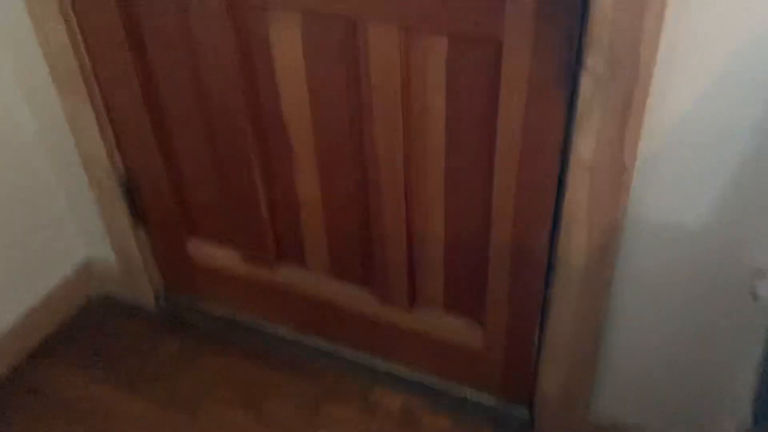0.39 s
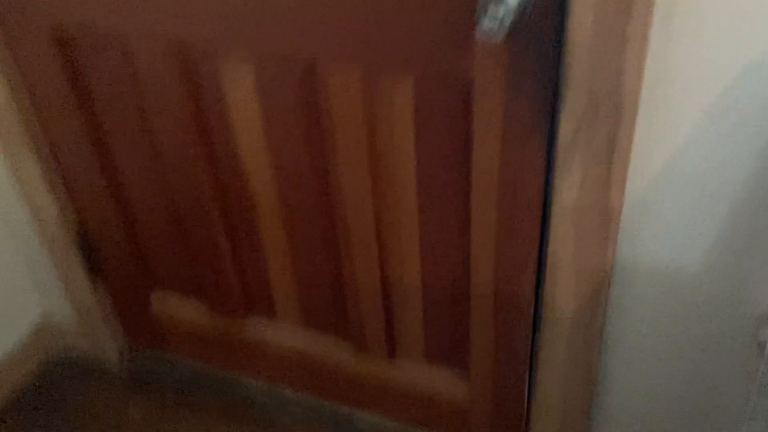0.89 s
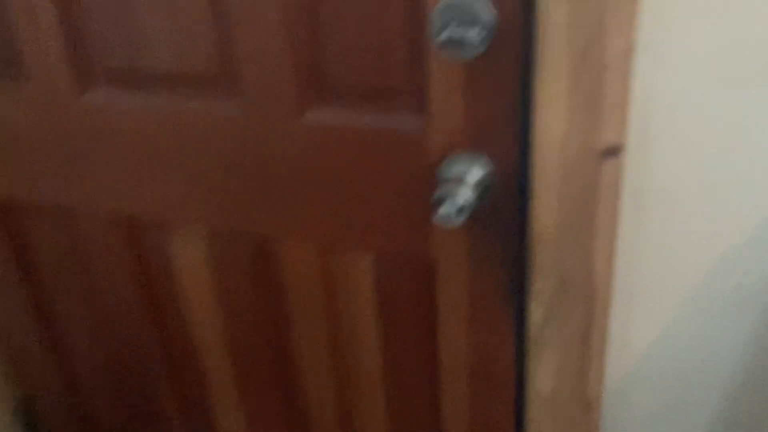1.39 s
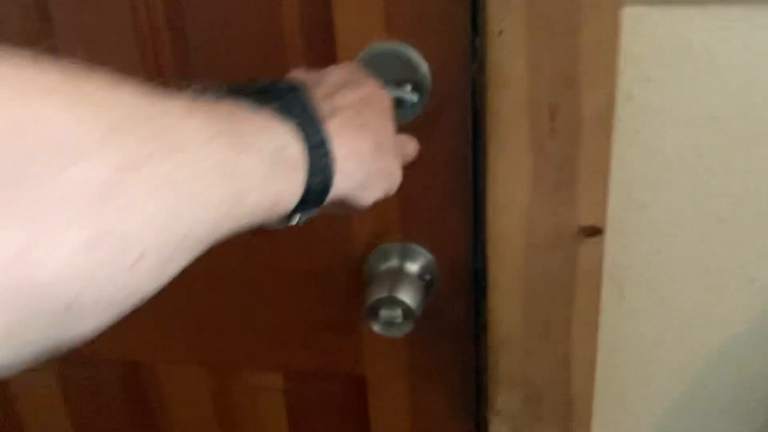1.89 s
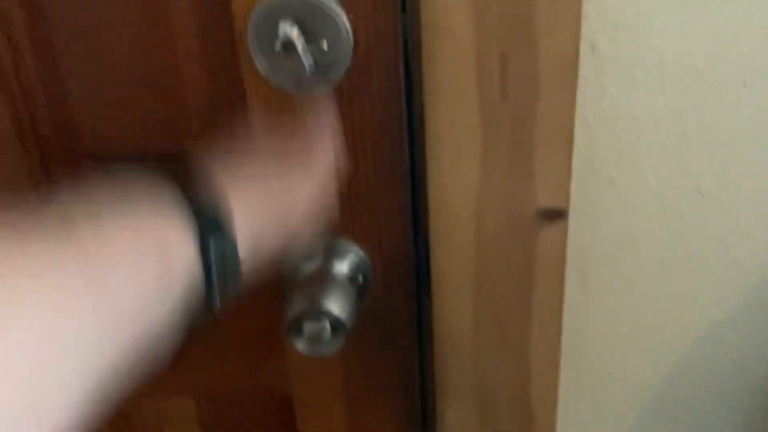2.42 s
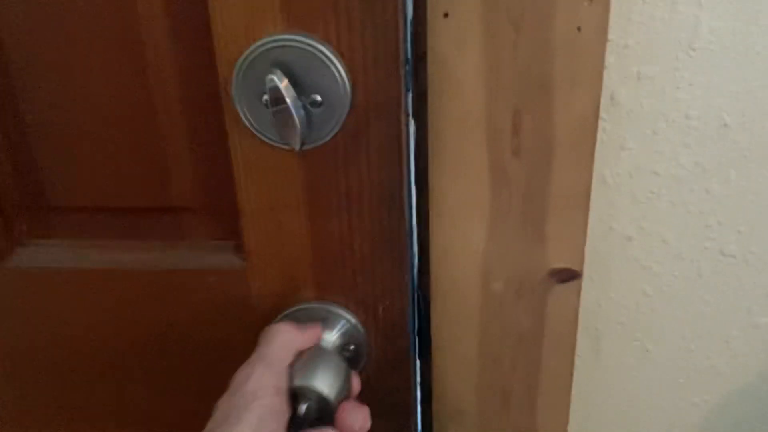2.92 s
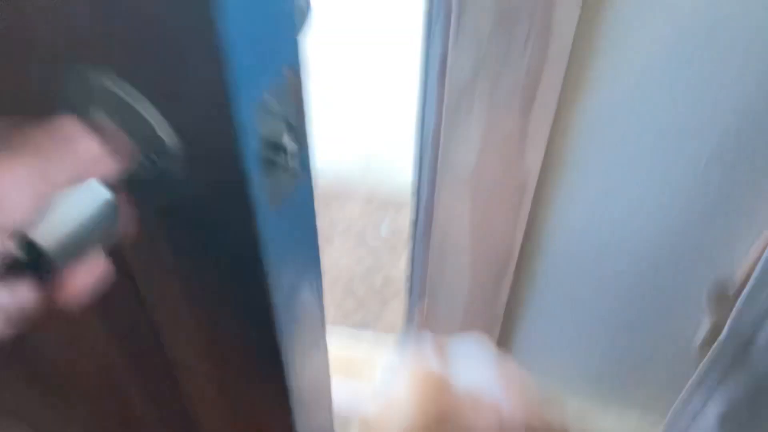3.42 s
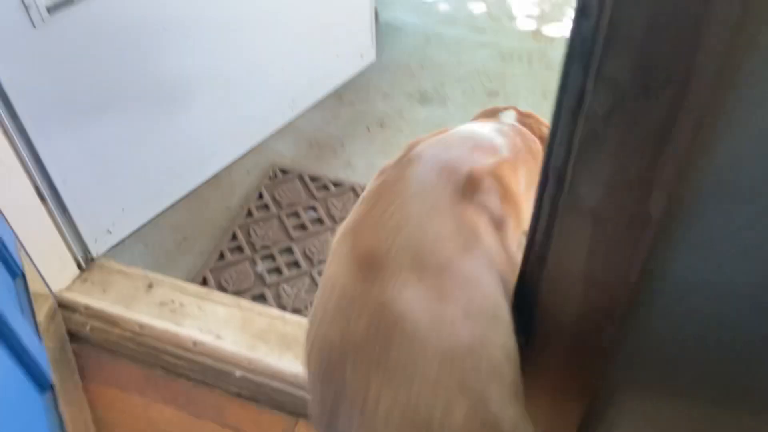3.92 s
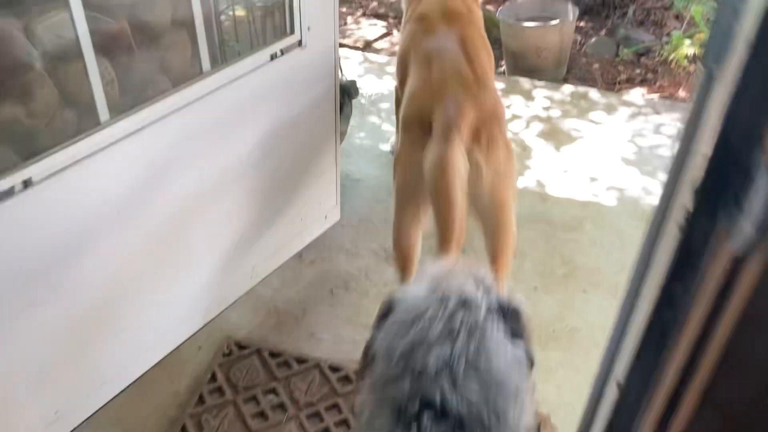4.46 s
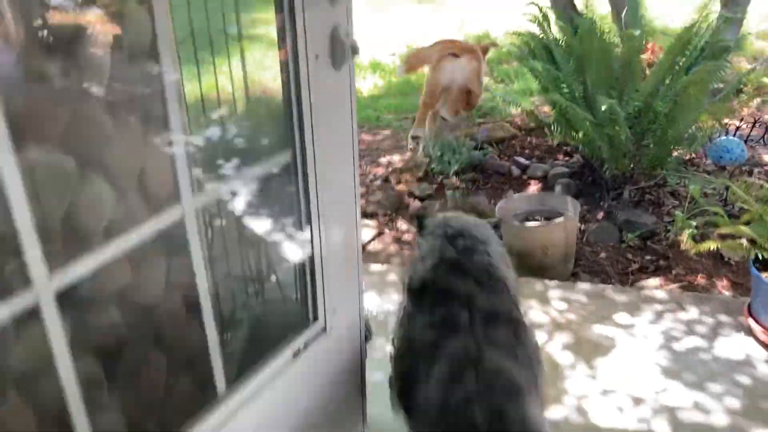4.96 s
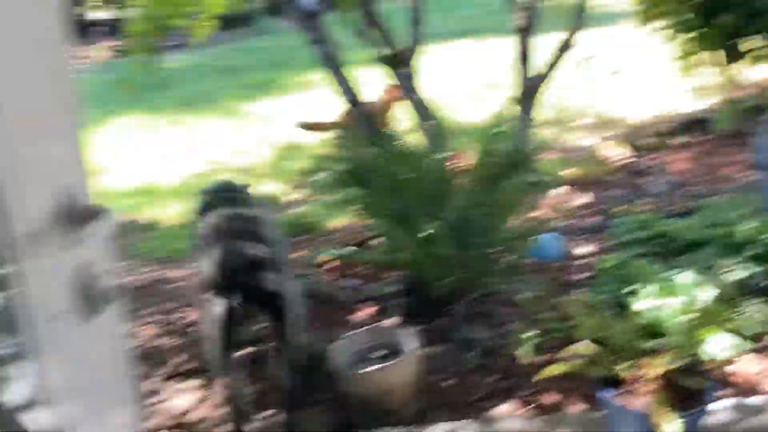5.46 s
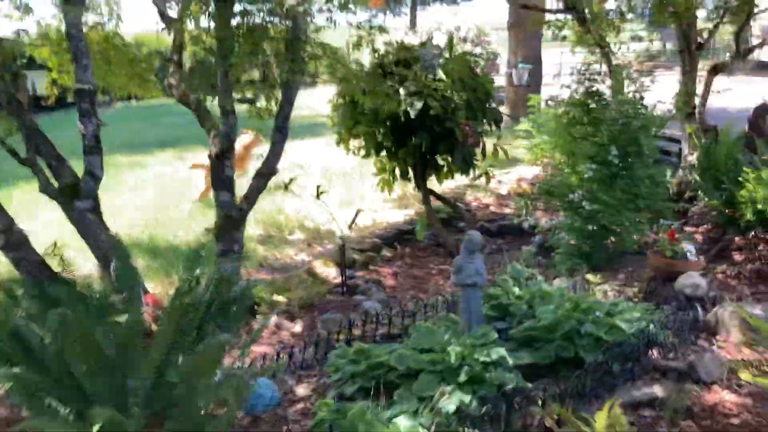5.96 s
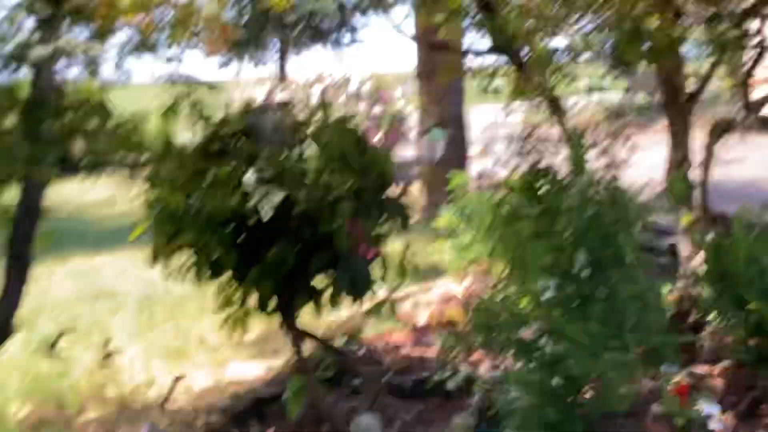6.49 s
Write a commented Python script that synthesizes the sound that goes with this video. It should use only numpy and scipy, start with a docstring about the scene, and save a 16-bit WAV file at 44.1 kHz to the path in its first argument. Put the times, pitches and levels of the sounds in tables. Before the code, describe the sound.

Close hand-held capture of paws and steps on boards, a deadbolt snapping, a latch rattling, a sharp door bang, skittering claws, then a dry tap.

```python
"""A wooden hall floor at a house door: two dogs mill about while a person steps, works the lock and goes out.
Damped floor modes give treads and knocks; showers of tiny impacts give claws, lock and storm-door bang.
Single pushes give taps and clacks, dispersed pulses give heel strikes, and a gliding tone a hinge squeal.
Coloured noise is the stir of feet and fur; octave noise tails are the hall's echo, sent more strongly later.
A dry tap on the hand-held phone's case comes near the end; a gapped treble colours everything."""
import sys
import numpy as np
from scipy import signal
from scipy.fft import rfft, irfft, next_fast_len
from scipy.io import wavfile
from scipy.ndimage import uniform_filter1d

SR = 44100
rng = np.random.default_rng(int(sys.argv[2]) if len(sys.argv) > 2 else 0)


def boost(x):
    """Linear amplitude factor 10**(x/20) for a level x in decibels (scalar or array-like)."""
    u = np.asarray(x, float) / 20
    return 10 ** u


def generate_wav(sig):
    """Save sig (samples, or channels by samples) to the path in sys.argv[1] as 16-bit PCM at SR."""
    pcm = np.round(np.clip(np.atleast_2d(sig).T, -1, 1) * 32767).astype(np.int16)
    wavfile.write(sys.argv[1], SR, pcm)


N = 291280
T = np.arange(N) / SR

# diffuse sound, correlation between left and right: pitch_hz, correlation
PORT_CORRELATION = [(60, 0.94), (130, 0.65), (290, 0.98), (640, 0.35), (1410, -0.0016), (3100, -0.096),
                    (6820, 0.17), (15000, -0.19)]
# echo send, rising over time: time_s, level_db
HALL_SEND = [(0, -18), (4.3, -15.5), (5.2, -11), (6.6, -3.5)]
# decay of the hall's echo: pitch_hz, t60_s
HALL_DECAY = [(100, 0.16), (500, 0.49), (2000, 0.43), (4000, 0.46), (8000, 0.031)]
# constant moving about: time_s, floor_rumble_db, shuffling_feet_db, fur_and_cloth_rustle_db
STIR_LEVELS = [(0.0, -33, -39.5, -50), (0.22, -50, -37, -41), (0.64, -37.5, -56.5, -66.5),
               (0.97, -37, -47.5, -53), (1.27, -48, -48, -59), (1.49, -38, -58, -61),
               (1.93, -44.5, -48, -49), (2.319, -36.5, -50, -64.5), (2.63, -36, -49, -56.5),
               (2.9, -31.5, -36, -46.5), (3.58, -37.5, -46.5, -52), (3.919, -64, -41.5, -50),
               (4.17, -25.5, -40, -44.5), (4.341, -37.5, -45.5, -38.5), (4.54, -27, -44, -45.5),
               (4.778, -42, -51, -48.5), (4.98, -50, -53, -52.5), (5.24, -40, -51.5, -53),
               (5.53, -42.5, -53, -49.5), (6.6, -50.5, -56, -63)]
# relative spectra of the three kinds of stir: pitch_hz, density_db
RUMBLE_SPECTRUM = [(12, -45.5), (20, 2.5), (43, 7.5), (65, 9.5), (82, -2), (172, -7.5), (300, -30),
                   (390, -36), (660, -120)]
SHUFFLE_SPECTRUM = [(100, -5.5), (200, 2), (500, 0), (1000, -6), (1600, -10.5), (2400, -15), (3500, -22.5),
                    (6000, -36.5)]
RUSTLE_SPECTRUM = [(1000, -6.5), (2200, 6), (4000, 7), (6000, 1.5), (8000, -0.5), (11500, 0.5),
                   (14000, -11.5), (16500, 4.5)]
# body weight landing, the floor and door boom: start_s, level_db, ring_hz, t60_s
TREAD_EVENTS = [(0.147, -24, 50.5, 0.18), (0.326, -16, 53, 0.16), (0.41, -24.5, 56, 0.074),
                (0.72, -21.5, 58.2, 0.24), (0.956, -28.5, 60.1, 0.64), (1.039, -29.5, 51.5, 0.13),
                (1.253, -21.5, 58.7, 0.034), (1.831, -30, 49, 0.11), (2.089, -43, 49.5, 0.18),
                (2.199, -34, 44, 0.2), (2.278, -15.5, 110, 0.045), (2.33, -37, 50.5, 0.15),
                (2.442, -30.5, 57.7, 0.29), (2.53, -32, 40.7, 0.33), (2.64, -20.5, 58.7, 0.21),
                (2.803, -22.5, 49.5, 0.16), (2.878, -27, 43, 0.17), (2.949, -23.5, 52, 0.34),
                (3.181, -22, 65, 0.077), (3.376, -32, 67.6, 0.17), (3.498, -38, 53.6, 0.082),
                (3.708, -31, 63.6, 0.28), (3.816, -20, 75.6, 0.15), (3.856, -14, 52.7, 0.065),
                (3.952, -19.5, 122.5, 0.2), (4.163, -19, 47.8, 0.18), (4.329, -32, 41.4, 0.22),
                (4.418, -23, 52.3, 0.075), (4.523, -19, 58.5, 0.21), (4.48, -38, 62.5, 0.11),
                (4.608, -22, 103.5, 0.12), (4.677, -30, 62.3, 0.052), (5.035, -20, 55, 0.2),
                (5.232, -33, 68.4, 0.17), (5.6, -35, 65, 0.08), (5.71, -39, 91, 0.17),
                (6.001, -31.5, 55, 0.13), (6.197, -35, 110, 0.1)]
# heels and paw pads knocking boards and panels: start_s, level_db, ring_hz
KNOCK_EVENTS = [(0.043, -23, 150.5), (0.135, -27, 134), (0.311, -22, 223), (0.509, -36.5, 187),
                (0.58, -33, 157), (0.711, -21, 164), (0.882, -40.5, 197), (0.96, -31.5, 162),
                (1.263, -20, 248.4), (1.288, -30.5, 237), (1.314, -28.5, 114), (1.479, -36, 151),
                (1.589, -21.5, 153.6), (1.622, -42, 165), (2.072, -29.5, 154), (2.13, -32.5, 147.6),
                (2.284, -15, 148.5), (2.505, -33.5, 121), (2.547, -31.5, 123), (2.661, -25, 123),
                (2.674, -22, 155), (2.813, -22, 250), (2.822, -22, 167), (2.862, -22.5, 372),
                (2.949, -24.5, 138.6), (2.999, -27, 120), (3.171, -18.5, 256.6), (3.211, -24.5, 142.5),
                (3.384, -30.5, 166), (3.477, -28.5, 303), (3.67, -28.5, 178), (3.819, -18.5, 123),
                (3.93, -13.5, 233), (3.954, -22, 238.5), (4.143, -26.5, 145.3), (4.27, -41, 115),
                (4.312, -26, 174), (4.497, -32.5, 152), (4.602, -20, 129), (4.666, -30, 118),
                (4.968, -33, 133), (5.024, -23, 128), (5.184, -35, 124), (5.447, -24.5, 166),
                (5.471, -25, 207), (6.037, -40.5, 127), (6.107, -41, 236), (6.394, -36, 318.6)]
# hard heel and pad strikes sending a bending wave along the floor: start_s, level_db, top_hz, spread_ms
STRIKE_EVENTS = [(0.703, -42, 810, 4.1), (1.2568, -31, 1250, 5.8), (1.5769, -41, 1190, 7),
                 (2.658, -36, 1490, 4.7), (4.271, -42, 2100, 4.3), (4.668, -25.5, 1500, 4),
                 (5.016, -37, 900, 4.66), (5.439, -55, 910, 7.3), (5.463, -31, 1180, 3.9),
                 (6.389, -42.5, 689, 6.8)]
# single pad and claw taps: start_s, level_db, contact_hz
TAP_EVENTS = [(0.126, -34, 2200), (0.283, -29, 1000), (0.307, -23, 4370), (0.311, -31, 910),
              (0.877, -57, 900), (0.952, -52, 900), (1.15, -47, 950), (1.258, -46, 3000), (1.465, -44, 740),
              (1.579, -39, 940), (2.6605, -41, 1600), (3.572, -37, 900), (3.664, -29, 3000),
              (3.671, -24, 2810), (4.1245, -19, 2150), (4.257, -31, 2200), (4.272, -23, 2000),
              (4.304, -33, 2000), (4.4144, -19, 2310), (4.4907, -22, 4850), (4.493, -30, 2400),
              (4.524, -30, 3000), (4.68, -19, 1010), (4.69, -28, 3550), (4.7085, -19, 7600),
              (4.8638, -34, 775), (4.8913, -48, 900), (5.438, -38, 1000), (5.466, -28, 950),
              (5.598, -48, 750), (5.69, -42, 566), (5.712, -42, 560), (5.794, -43, 520), (5.936, -47, 476),
              (6.037, -32, 755), (6.045, -41, 330)]
# claws skittering: start_s, level_db, contact_hz, treble_db, length_ms
CLAW_EVENTS = [(0.0897, -39, 1510, -10, 11), (0.1251, -31.5, 2200, 4, 16), (0.045, -41.5, 600, -11, 56),
               (0.165, -38, 900, -19, 20), (0.22, -39, 800, -13, 92), (0.2783, -39.5, 1340, 1, 5.7),
               (0.2997, -25.5, 2500, -3, 7.3), (0.306, -25.5, 1820, -9, 19),
               (0.415, -36.5, 2050, -27.5, 12), (0.5082, -37.5, 1450, -8.5, 31),
               (0.5816, -36.5, 1560, -21, 9.2), (0.612, -38.5, 1470, -26, 35), (0.705, -42, 1540, -23, 7),
               (1.259, -43, 1500, -2.5, 39), (1.4636, -44, 1530, -10.5, 19.5), (1.5783, -48, 990, -22, 5),
               (1.622, -61, 1800, -18, 3.6), (1.6516, -36.5, 1710, -10, 24), (1.065, -45, 1880, -9, 7.9),
               (1.108, -47, 1780, -28, 47), (1.86, -40.5, 2010, -4, 22), (2.5441, -28.5, 1210, -17, 6.6),
               (2.5651, -31.5, 1320, -7.5, 3.9), (2.6599, -35.5, 1570, -3, 10.7),
               (2.7087, -33.5, 1400, -26, 10), (3.2899, -54.5, 1350, 17, 6), (3.3323, -52, 920, -2, 13),
               (3.355, -31, 1990, -12, 22), (3.375, -30, 2760, -9.5, 12), (3.5738, -33.5, 1280, -13, 7.1),
               (3.66, -34.5, 2500, -6.5, 9), (3.6696, -27, 2200, -14, 8.4), (3.825, -36.5, 2500, 1.5, 20),
               (3.8736, -36.5, 1000, -30, 4.4), (4.0617, -42.5, 2170, 5.5, 8.3),
               (4.124, -23, 2620, -8.5, 16.4), (4.136, -37, 2300, -20, 33), (4.161, -29.5, 2430, -15, 13),
               (4.257, -33, 2300, -20, 4), (4.2717, -19, 980, -22, 10.5), (4.3036, -25, 2080, -1.5, 11),
               (4.3839, -41, 2410, -26.5, 29), (4.4139, -31.5, 2720, -23, 6.1),
               (4.4328, -25.5, 3120, -21, 6.6), (4.4902, -20.5, 3680, -12, 6.5), (4.5236, -34, 2820, -3, 4),
               (4.637, -31, 3040, -21, 6.7), (4.6693, -20, 1370, -17, 8.6), (4.69, -23.5, 2680, -3, 2.8),
               (4.7082, -40.5, 3500, 20.5, 3), (4.787, -36, 2300, 1.5, 24), (4.806, -35, 2400, 5, 5.3),
               (4.815, -43.5, 3000, 12, 8.7), (4.734, -44.5, 3000, 10, 3), (4.8633, -35.5, 1370, -26, 5.7),
               (4.8908, -39.5, 1690, -5, 2.6), (4.9841, -44, 2480, 2, 14), (5.0185, -33, 770, -6, 7.6),
               (5.1726, -39.5, 2200, 3.5, 20), (5.2679, -39.5, 2350, 5, 13.5), (5.3916, -43, 1750, 2, 34),
               (5.4206, -42, 2700, 7, 12), (5.443, -57, 700, -20, 8.1), (5.466, -29.5, 1060, -35, 4.4),
               (5.6361, -44.5, 2250, 7, 39), (5.7753, -49.5, 1914, 1, 52), (6.0377, -48, 867, -22, 8.3),
               (6.1, -45.5, 1690, -9, 13.5), (6.3924, -51, 504, -27, 31), (6.52, -53, 1370, 2.5, 42)]
# modes of the floorboards: pitch_hz, level_db, t60_s
FLOORBOARD_MODES = [(620, -6, .03), (880, -3, .025), (1100, -2, .02), (1500, -3, .018), (2300, -2, .014),
                    (3100, -4, .012), (4300, -5, .01)]
# modes of the phone's case, listed from the low thump's up to the high tick's: pitch_hz, level_db, t60_s
CASE_MODES = [(92.6, 5, 0.14), (219, 3, 0.0403), (510, 2, 0.012), (885, 2.5, 0.0038), (3040, 0, 0.0014),
              (4760, 10.5, 0.0028)]
# a hinge squeals: time_s, pitch_hz, rms_db
SQUEAK_TRACK = [(4.02, 3320, -63), (4.035, 3335, -56), (4.056, 3325, -55), (4.075, 3300, -50),
                (4.12, 3330, -44.5), (4.128, 3330, -45)]
# storm door hits its stop: start_s, level_db, contact_hz, treble_db, length_ms
BANG_EVENTS = [(3.914, -28.5, 1760, -28, 8.2), (3.921, -14.5, 2210, -32, 5), (3.9262, -7, 1830, -39, 1.9),
               (3.9295, -9, 1330, -35, 3), (3.933, -5.5, 1000, -39, 1.5), (3.944, -25.5, 1315, -34, 11)]
# modes of the storm door: pitch_hz, level_db, t60_s
STORM_MODES = [(425, -4, 0.03), (790, -4, 0.02), (1172, -3, 0.016), (1510, -6, 0.016), (1650, 0.5, 0.022),
               (1900, 1.5, .02), (2240, -12, 0.015), (2520, -14, 0.015), (3350, -9, 0.013),
               (4200, -8, 0.012)]
# bolt, knob and latch: start_s, level_db, contact_hz, treble_db, length_ms
LOCK_EVENTS = [(2.057, -32, 1700, -17.5, 9.1), (2.0645, -19, 1520, -4.5, 6.4),
               (2.072, -28.5, 1300, -24, 7.7), (2.1305, -25, 2160, -7.5, 1.6),
               (2.137, -31, 1260, -10.5, 5.8), (2.402, -38.5, 2800, -21, 24),
               (2.2518, -34, 1750, -10.5, 12), (2.2865, -12, 2260, -27, 3), (2.2907, -5.5, 1630, -4, 3.2),
               (2.296, -9.5, 1200, -3.5, 7.1), (2.31, -24.5, 1100, -15, 9.7), (2.326, -33, 1010, -7, 30),
               (2.801, -26.5, 1880, -11.5, 28), (2.82, -30.5, 1300, -8, 28), (2.841, -27.5, 1500, -7, 8.7),
               (2.8494, -22, 1720, 2.5, 7.3), (2.859, -23, 1100, -21.5, 7.5), (2.866, -36.5, 1420, 12, 2.5),
               (2.9123, -34, 1120, -26.5, 33), (2.9337, -47, 1190, -22, 38), (2.947, -22, 3140, 2, 7.5),
               (2.9996, -19.5, 990, -10.5, 4.9), (3.006, -29.5, 2500, -5, 13.5),
               (3.1645, -27, 2060, -8, 9.6), (3.172, -28, 2570, -3.5, 4.7), (3.476, -30.5, 2500, -8, 4.3),
               (3.48, -23, 1750, -9, 5.3), (3.5039, -23.5, 2700, 1, 8.5)]
# the bolt or latch seats with one clean blow: start_s, level_db, contact_hz
CLACK_EVENTS = [(2.0645, -29, 3600), (2.0668, -16.5, 1380), (2.069, -28, 387), (2.132, -33, 1350),
                (2.296, -7.5, 1550), (2.299, -11, 770), (2.309, -21.5, 400), (2.813, -21, 420),
                (2.826, -26, 800), (2.859, -24.5, 900), (2.872, -23, 600), (2.936, -24, 990),
                (2.948, -27, 4400), (3.0005, -21, 1070), (3.018, -29, 895), (3.1645, -29, 2000),
                (3.172, -25, 2880), (3.477, -25.5, 1100), (3.505, -27, 3600)]
# modes of the lock and its door: pitch_hz, level_db, t60_s
LOCKSET_MODES = [(390, 0.5, 0.05), (603, -10, 0.03), (799, 1, 0.05), (1061, -3, 0.025), (1320, 1, 0.05),
                 (1525, 1, 0.055), (1895, -2, .04), (2110, -7, 0.04), (2620, -9, .03), (3650, -12, .02),
                 (4350, -12, .015), (6940, -17, .008)]
# side on which each source is heard: time_s, left_lag_behind_right_ms
DOGS_LAG = [(0.1, -0.01), (.4, -0.27), (1.26, 0.006), (2.5, -0.13), (3.4, -.3), (4.1, -0.0063),
            (4.27, -0.28), (4.419, -0.16), (4.68, -0.316), (4.82, -0.03), (5.2, 0.18), (6.6, -0.26)]
LOCK_LAG = [(2, -0.116), (2.5, -0.2), (2.899, -0.093), (3.2, -0.4), (3.6, -0.25)]
STORM_DOOR_LAG = [(3.9, 0.09)]
# treble colour of the whole sound, with gaps near 9 and 13.5 kHz and above 16 kHz: pitch_hz, gain_db
TREBLE_COLOUR = [(4800, 0.5), (5800, -2.5), (6800, 4), (8200, 1), (8500, -9.5), (9500, -19), (9800, 1),
                 (12600, 5), (13000, -20.5), (14300, -22), (14700, 5.5), (15800, 0), (16100, -28)]


def on_log(hz, points):
    """Interpolation along a logarithmic frequency axis."""
    f, v = np.transpose(points)
    return np.interp(np.log(hz + 1), np.log(f), v)


def unit(x):
    """Normalisation to an rms of 1."""
    return x / np.sqrt(np.mean(x ** 2))


def add(out, sound, s):
    """Superposition: a short stereo sound joins the mix at time s."""
    i = int(s * SR)
    out[:, i:i + sound.shape[-1]] += sound[..., :N - i]


def grains(size, spread_db):
    """Impulsive noise: samples of unevenly spread level act as dense tiny impacts."""
    level_db = spread_db * np.minimum(rng.exponential(size=size), 4.5)
    return unit(rng.standard_normal(size) * boost(level_db))


def flicker(rate, depth_db):
    """Slow amplitude modulation: a gain that wanders in dB."""
    k = int(SR / rate)
    steps = np.repeat(rng.standard_normal(N // k + 1), k)
    return boost(depth_db * unit(uniform_filter1d(steps, k)[:N]))


def body(hz, modes, ring, detune=1):
    """Modal superposition: a causal direct crack plus damped resonances."""
    f, db, t60 = np.transpose(modes)[:, :, None]
    damp = np.log(1000) / (2 * np.pi * t60 * f * detune)
    ratio = hz / (f * np.reshape(detune, (-1, 1)))
    resonance = 2j * damp * ratio / (1 - ratio ** 2 + 2j * damp * ratio)
    return 1 + ring * np.sum(boost(db) * resonance, axis=0)


def mistuned(count, spread):
    """Mode scatter: each blow excites slightly shifted resonances."""
    return 1 + spread * rng.standard_normal((count, 1))


def bending(hz, spread_ms):
    """Plate dispersion: a tone of f Hz comes spread * sqrt(1 kHz / f) late, counted from 4 kHz."""
    return np.exp(-2j * np.pi * spread_ms / 1000 * (2 * np.sqrt(1000 * hz) - hz / 2))


def port_lags(side, s):
    """Interaural-style delay: half of the lag in ms on either port, left first."""
    return np.interp(s, *np.transpose(side)) * np.array([[1], [-1]]) / 2


def delayed(hz, ms):
    """Pure delay: a phase proportional to frequency."""
    return np.exp(-2j * np.pi * hz * ms / 1000)


def diffuse(points, spread_db, octaves=None):
    """Diffuse field: coloured grain noise, most alike in both ports in the bass; whole, or in octaves."""
    size = next_fast_len(N)
    hz = np.fft.rfftfreq(size, 1 / SR)
    like = np.clip(on_log(hz, PORT_CORRELATION), -.9, .98)
    coloured = rfft(grains((2, size), spread_db)) * boost(on_log(hz, points))
    mid, side = coloured * np.sqrt([1 + like, 1 - like])
    power = 2 * np.mean(abs(mid) ** 2 + abs(side) ** 2) / size
    ports = np.array([mid + side, mid - side]) / np.sqrt(power)
    if octaves is None:
        return irfft(ports, size)[:, :N]
    bands = []
    for f in octaves:
        window = np.cos(np.pi / 2 * np.clip(np.log2((hz + 1) / f), -1, 1)) ** 2
        bands.append(irfft(ports * window, size)[:, :N])
    return bands


def after(events, under_db, lasts_s):
    """Energy addition: level of the noise that swells and fades after each event."""
    events = np.array(events)
    age = np.maximum(T - events[:, :1], 0) / lasts_s
    swell = boost(events[:, 1:2] + under_db) * age * np.exp(1 - age)
    return np.sqrt(np.sum(swell ** 2, axis=0))


def hall(x):
    """Reverberation in a small hard hallway: one decaying noise tail per octave."""
    t = np.arange(SR // 2) / SR
    tail = 0
    for hz in 90 * 2. ** np.arange(8):
        octave = signal.butter(2, [hz / np.sqrt(2), hz * np.sqrt(2)], "band", fs=SR, output="sos")
        band = signal.sosfilt(octave, grains((2, len(t)), 1.2))
        tail = tail + band * boost(-60 * t / on_log(hz, HALL_DECAY))
    tail = tail * (1 - np.exp(-(t / 0.00088) ** 2))
    tail = tail / np.sqrt(np.sum(tail ** 2) / 2)
    send = x.mean(axis=0) * boost(np.interp(T, *np.transpose(HALL_SEND)))
    return signal.fftconvolve(send[None], tail, axes=1)[:, :N]


def stir():
    """Broadband friction noise: boards rumble, pads scuff and fur brushes, also between the clear blows."""
    s, *levels = np.transpose(STIR_LEVELS)
    rumble, shuffle, rustle = (boost(np.interp(T, s, c)) for c in levels)
    # boards keep rumbling after a tread; a foot or paw brushes the floor after each knock
    rumble = np.hypot(rumble, after(TREAD_EVENTS, under_db=-13.5, lasts_s=0.04))
    shuffle = np.hypot(shuffle, after(KNOCK_EVENTS, under_db=-22, lasts_s=0.012))
    scuff = flicker(37, 0.85)
    # many feet at once: every octave of the shuffle comes in lumps of its own
    octaves = diffuse(SHUFFLE_SPECTRUM, 3.85, 170 * 2 ** np.arange(5))
    feet = sum(flicker(45, 2.7) * band for band in octaves)
    boards = flicker(12, 2.5) * diffuse(RUMBLE_SPECTRUM, 0.)
    fur = flicker(60, 3.1) * diffuse(RUSTLE_SPECTRUM, 2.7)
    return rumble * boards + scuff * (shuffle * feet + rustle * fur)


def treads():
    """Low-mode resonance: under a soft heavy landing the floor swells briefly, then dies."""
    out, t = np.zeros((2, N)), np.arange(SR // 2) / SR
    for s, db, hz, t60 in TREAD_EVENTS:
        shape = (1 - np.exp(-(t / 0.01) ** 2)) * boost(-60 * t / t60)
        cycles = hz * (t + 0.005 * (1 - np.exp(-t / 0.03)))  # the pitch starts a little high
        wave = np.sin(2 * np.pi * cycles + [[.15], [-.15]])
        add(out, boost(db) * shape / shape.max() * wave * [[.88], [1.12]], s)
    return out


def knocks():
    """Modal ringing: a blow excites a board's main mode and a cluster of weaker neighbours."""
    out, t = np.zeros((2, N)), np.arange(SR // 5) / SR
    for s, db, hz in KNOCK_EVENTS:
        t60 = 0.14 * (150 / hz) ** 0.27  # s; higher boards die sooner
        chance = rng.uniform(-1.134, 1, (3, 5, 1))
        f = hz * np.array([[.78], [1], [1.3], [1.75], [2.4]]) * (1 + 0.089 * chance[0])
        gain = boost(np.array([[-5], [0], [-4], [-7], [-11]]) + 3.2 * chance[1])
        phase = np.array([-1, 1])[:, None, None] * 0.24 * chance[2]
        modes = gain * np.sin(2 * np.pi * f * t + phase) * boost(-60 * t / t60 * f / hz)
        ring = np.sum(modes, axis=1)
        ring *= 1 - np.exp(-(t * hz / 0.45) ** 2)  # a soft pad pushes for about half a cycle
        add(out, boost(db) * ring / abs(ring).max() * [[.92], [1.08]], s - .003)
    return out


def strikes():
    """Bending-wave dispersion: the floor draws a short push into a falling chirp that rings the boards."""
    out, hz = np.zeros((2, N)), np.fft.rfftfreq(8192, 1 / SR)
    for s, db, top_hz, spread_ms in STRIKE_EVENTS:
        u, v = 1j * hz / top_hz, 1j * hz / 160
        push = (v / (1 + v)) ** 2 / (1 + 3.3 * u + u ** 2) ** 2
        push = push * body(hz, FLOORBOARD_MODES, 5.4, mistuned(len(FLOORBOARD_MODES), 0.099))
        lag_ms = port_lags(DOGS_LAG, s) + 4
        wave = irfft(push * bending(hz, spread_ms) * delayed(hz, lag_ms))
        add(out, boost(db) * wave / abs(wave).max(), s - .004)
    return out


def single_blows(events, side, modes, ring, width, detune, size):
    """Impulse excitation: one short push, coloured by the contact, rings the struck body's modes."""
    out, hz = np.zeros((2, N)), np.fft.rfftfreq(size, 1 / SR)
    for s, db, centre in events:
        u = 1j * hz / centre
        push = (width * u / (1 + width * u + u ** 2)) ** 2
        push = push * body(hz, modes, ring, mistuned(len(modes), detune))
        wave = irfft(push * delayed(hz, port_lags(side, s) + 1))
        add(out, boost(db) * wave / abs(wave).max(), s - .001)
    return out


def rattles(events, side, modes, ring, width, unlike, spread_db, clump_db, detune,
            rise, halo_db, strike_db, spread_ms):
    """Repeated micro-impact: a quick shower, coloured by the contact, rings the struck body."""
    out, size, early = np.zeros((2, N)), 6144, .012
    t, hz = np.arange(size) / SR - early, np.fft.rfftfreq(size, 1 / SR)
    for s, db, centre, treble_db, length_ms in events:
        span = np.maximum(t, 0) * 1000 / length_ms
        # longer scrapes also take longer to build up
        blow = (1 - np.exp(-span / rise)) * np.exp(-span ** 0.77) * np.clip((.12 - t) / 0.036, 0, 1)
        # a faint noise halo surrounds each onset
        blow += boost(halo_db) * np.exp(-abs(t) / 0.0069) * (t > .001 - early)
        # the first contact is a sharp tick, weaker in long scrapes
        tick = np.exp(-abs(t - .001) / .0012) * (t > .001)
        blow += boost(strike_db) * min(1, 12 / length_ms) * tick
        # the treble of a contact is over sooner than its body, and its halo is weaker before the onset
        treble_fade = (0.22 + 1.0 * np.exp(-span / 0.3)) * np.where(t < 0, .35, 1)
        blow = blow * np.array([np.ones(size), treble_fade])
        # impacts come in clumps of 64 samples, about 1.5 ms: separate ticks
        shower = blow * boost(clump_db * np.repeat(rng.standard_normal(size // 64), 64))
        same, left, right = grains((3, 2, size), spread_db) * shower
        ports = np.array([same + unlike * left, same + unlike * right])
        power = np.mean(ports ** 2, axis=(0, 2), keepdims=True)
        ports = rfft(ports * np.sqrt(np.mean(blow[0] ** 2) / power))
        u, v = 1j * hz / centre, 1j * hz / 6000
        struck = body(hz, modes, ring, mistuned(len(modes), detune))
        low = struck * width * u / (1 + width * u + u ** 2) / (1 + v) ** 2
        low = low / np.sqrt(np.mean(abs(low) ** 2))
        high = boost(treble_db) * unit(abs(struck)) * (v ** 2 / (1 + 1.026 * v + v ** 2)) ** 2
        high = high / (1 + (v / 1.43) + (v / 1.79) ** 2)
        sound = ports[:, 0] * low * bending(hz, spread_ms) + ports[:, 1] * high
        # the sound reaches one port a little before the other
        sound = sound * delayed(hz, port_lags(side, s))
        add(out, boost(db) * irfft(sound), s - early - .001)
    return out


def taps():
    """Point impact: single pads and claws tap the floorboards."""
    return single_blows(TAP_EVENTS, DOGS_LAG, FLOORBOARD_MODES, ring=1.8, width=0.39, detune=0.026, size=1536)


def claws():
    """Skittering contact: claws shower the floorboards with tiny impacts."""
    return rattles(CLAW_EVENTS, DOGS_LAG, FLOORBOARD_MODES, ring=2.1, width=1.6, unlike=0.81,
                   spread_db=2.0, clump_db=1.0, detune=0.13, rise=0.42, halo_db=-13.5,
                   strike_db=-6.5, spread_ms=2.505)


def phone_tap():
    """Case-borne transmission: a dry tick on the phone's case and its thump pass straight to both ports."""
    hz = np.fft.rfftfreq(8192, 1 / SR)
    lag_ms = 1 + np.array([[1], [-1]]) * 0.345 / 2
    # the case's low modes answer 1.94 ms after the tick
    thump = (body(hz, CASE_MODES[:4], 0.75) - 1) * delayed(hz, 1.94) / (1 + 1j * hz / 1200) ** 2
    tick = (body(hz, CASE_MODES[3:], 0.92) - 1) / (1 + 1j * hz / 6500) ** 3
    tap = irfft((tick + boost(8.0) * thump) * delayed(hz, lag_ms))
    start_s, peak_db = 6.2, -3.5
    out = np.zeros((2, N))
    add(out, boost(peak_db) * tap / abs(tap).max(), start_s - .001)
    return out


def squeak():
    """Stick-slip friction: a hinge gives a thin tone of nearly steady pitch."""
    s, hz, db = np.transpose(SQUEAK_TRACK)
    gain = boost(np.interp(T, s, db, -120, -120)) * flicker(63, 1.6)
    phase = 2 * np.pi * np.cumsum(np.interp(T, s, hz)) / SR
    return np.sqrt(2) * gain * np.sin(phase)


def storm_door_bang():
    """Panel impact: the storm door strikes its stop and its damped modes ring."""
    return rattles(BANG_EVENTS, STORM_DOOR_LAG, STORM_MODES, ring=10.0, width=1.9, unlike=0.34,
                   spread_db=2.0, clump_db=-4.0, detune=0.042, rise=0.84, halo_db=-15.5,
                   strike_db=1.5, spread_ms=3.565)


def lock_rattle():
    """Metal contact: bolt, knob and latch scrape and rattle against the lock's modes."""
    return rattles(LOCK_EVENTS, LOCK_LAG, LOCKSET_MODES, ring=1.5, width=3.15, unlike=1.0,
                   spread_db=2.0, clump_db=-3.0, detune=0.042, rise=0.54, halo_db=-18.5,
                   strike_db=0.5, spread_ms=3.502)


def lock_clacks():
    """Seating impact: the bolt or latch comes home with one clean blow."""
    return single_blows(CLACK_EVENTS, LOCK_LAG, LOCKSET_MODES, ring=7.3, width=.6, detune=0.023, size=3072)


def scene():
    """Superposition of direct and reverberant sound; treads, stir and the case tap stay dry."""
    inside = knocks() + strikes() + taps() + claws() + lock_rattle() + lock_clacks()
    outside = squeak() + storm_door_bang()
    # the storm door is half outdoors, so it excites the hall less
    echo = hall(inside + boost(-14) * outside)
    return stir() + echo + treads() + phone_tap() + outside + inside


def band_limit(x):
    """A steep low-pass at the top of the band."""
    return signal.sosfilt(signal.butter(12, 16790, fs=SR, output="sos"), x)


def record(dry):
    """Filtering and saturation: deepest bass and top are cut, the treble gapped, the loudest peaks rounded."""
    x = signal.sosfilt(signal.butter(5, 37, "high", fs=SR, output="sos"), dry)
    size = next_fast_len(N)
    colour = boost(on_log(np.fft.rfftfreq(size, 1 / SR), TREBLE_COLOUR))
    x = irfft(rfft(x, size) * colour, size)[:, :N]
    x = .9 * np.tanh(x / .9)
    x = signal.sosfilt(signal.ellip(8, .2, 70, 16600, fs=SR, output="sos"), x)
    return band_limit(x)


dry = scene()
out = record(dry)
generate_wav(out)
```